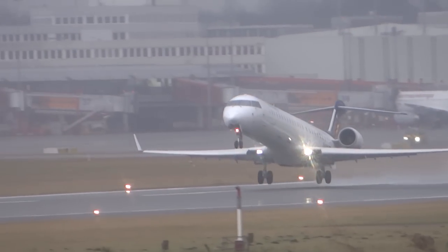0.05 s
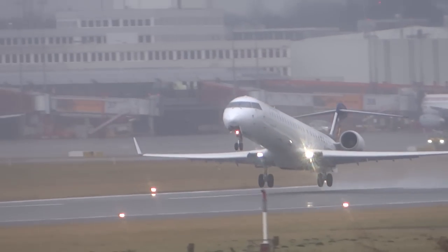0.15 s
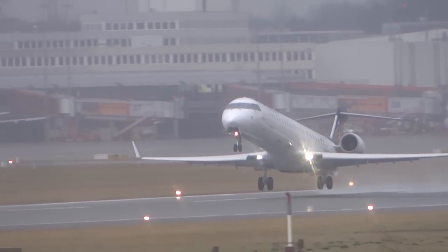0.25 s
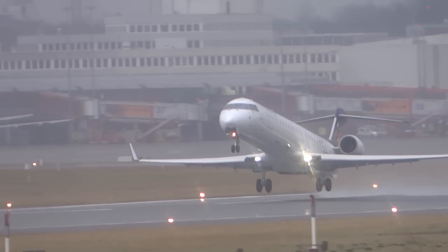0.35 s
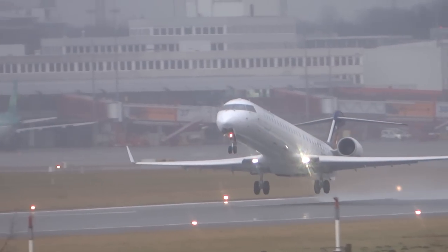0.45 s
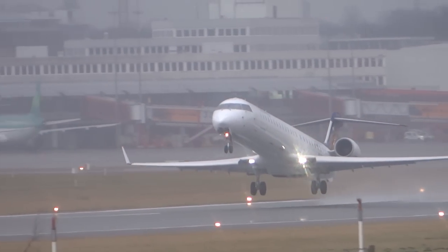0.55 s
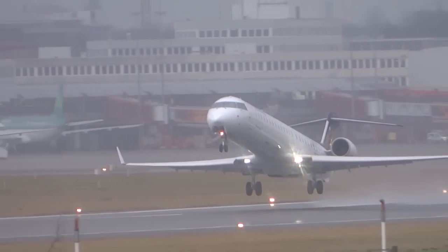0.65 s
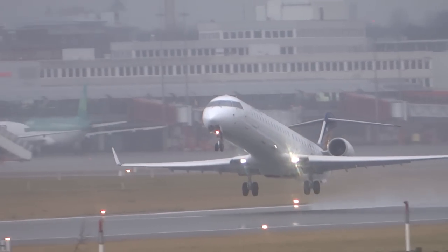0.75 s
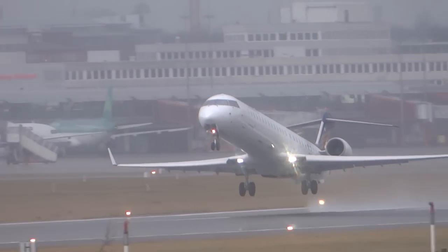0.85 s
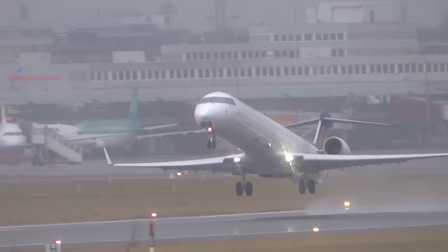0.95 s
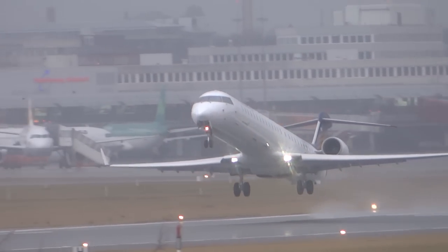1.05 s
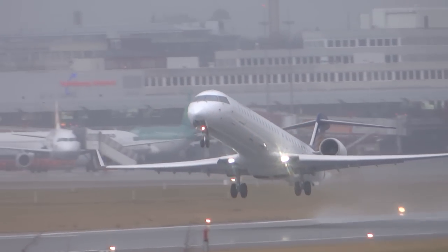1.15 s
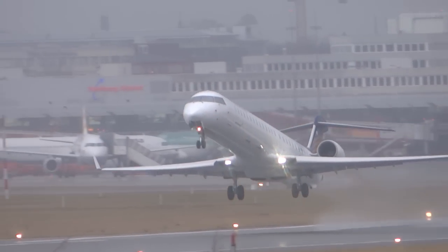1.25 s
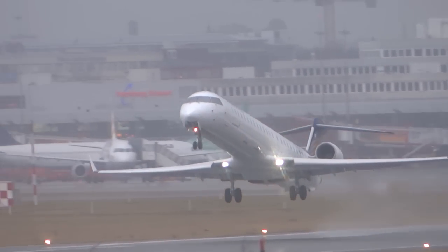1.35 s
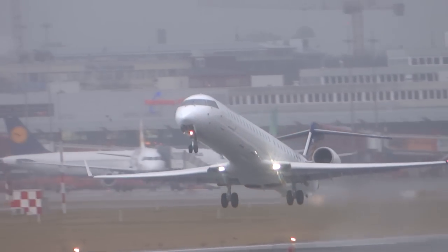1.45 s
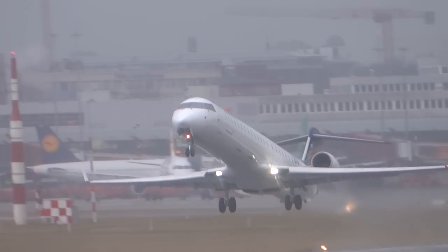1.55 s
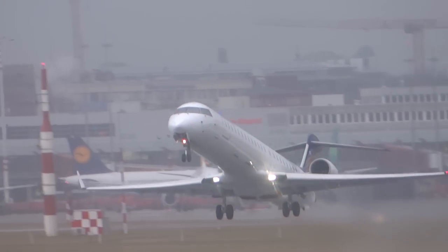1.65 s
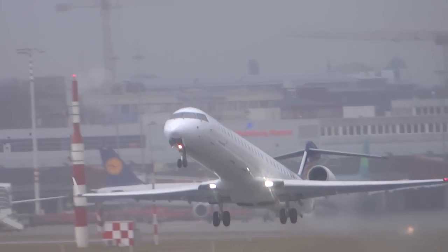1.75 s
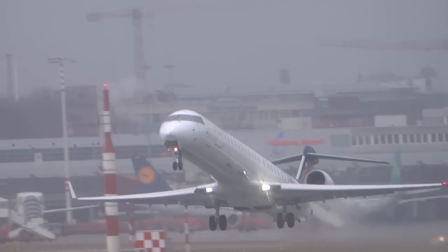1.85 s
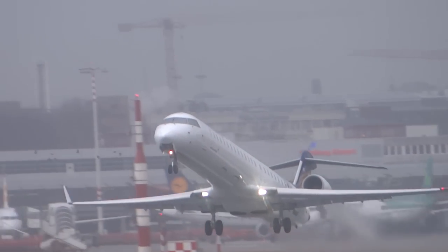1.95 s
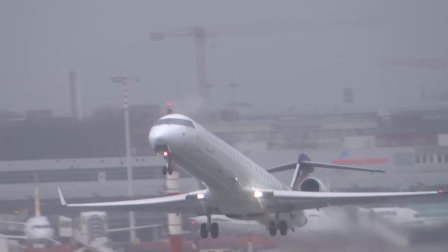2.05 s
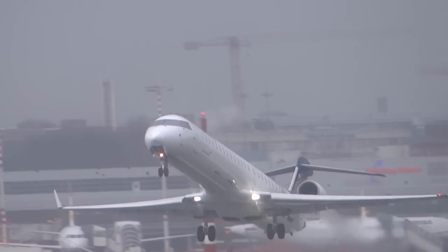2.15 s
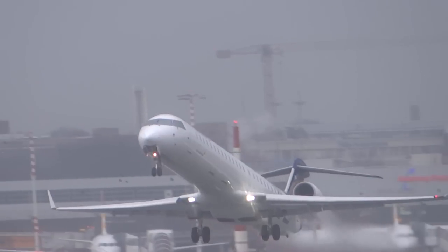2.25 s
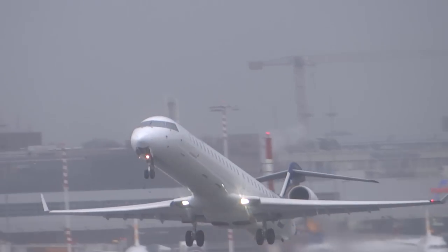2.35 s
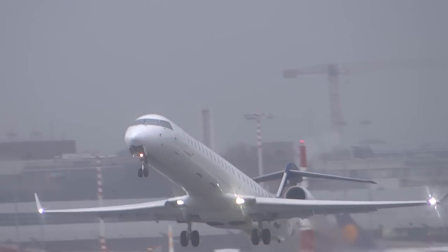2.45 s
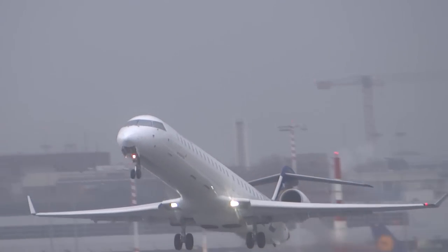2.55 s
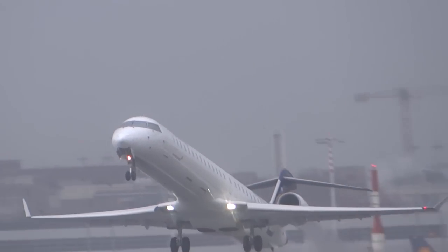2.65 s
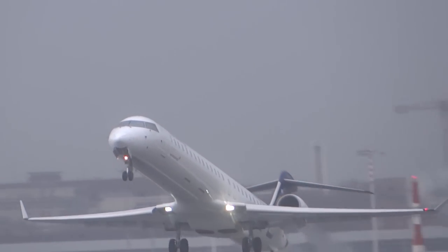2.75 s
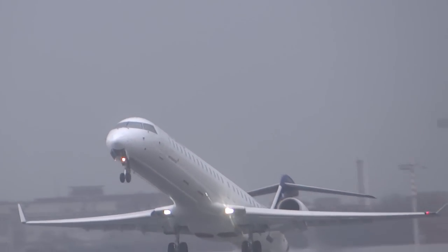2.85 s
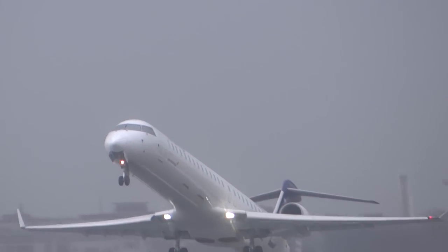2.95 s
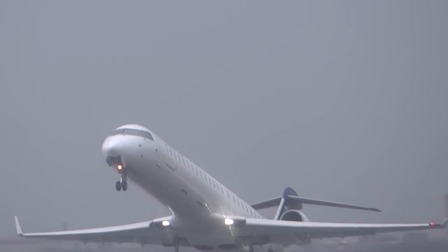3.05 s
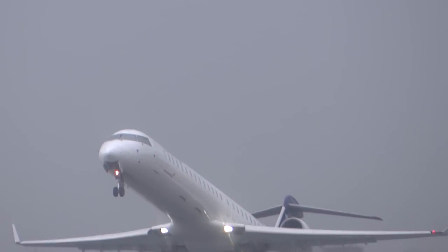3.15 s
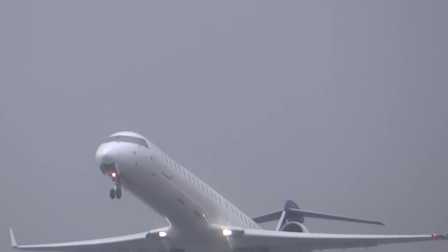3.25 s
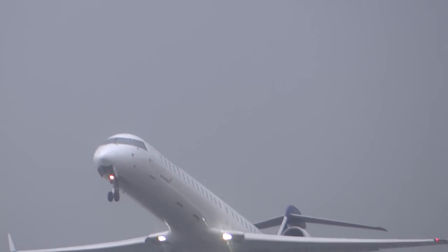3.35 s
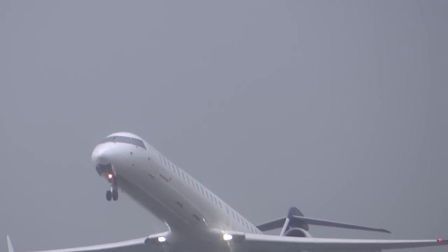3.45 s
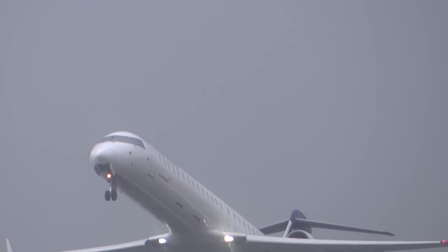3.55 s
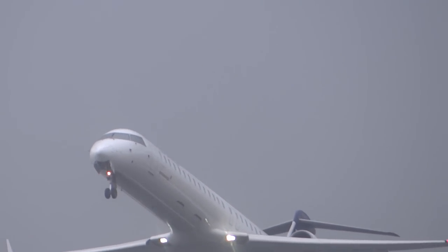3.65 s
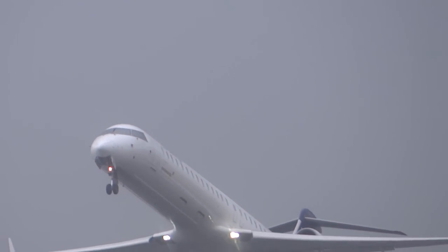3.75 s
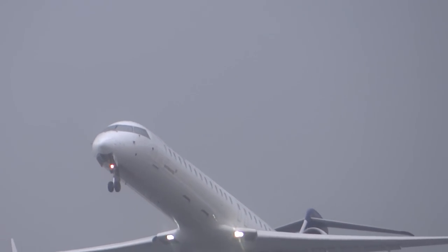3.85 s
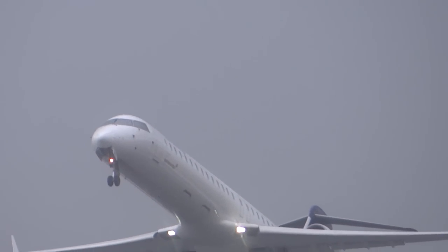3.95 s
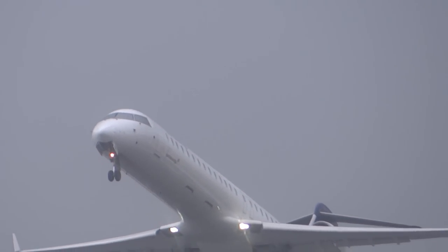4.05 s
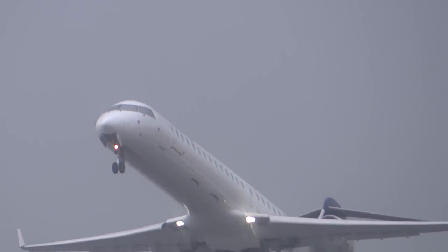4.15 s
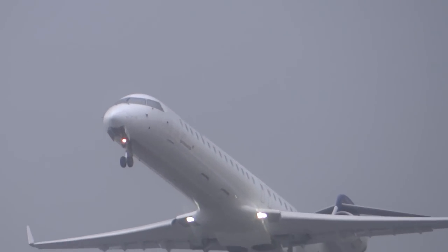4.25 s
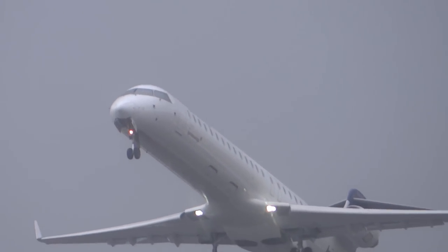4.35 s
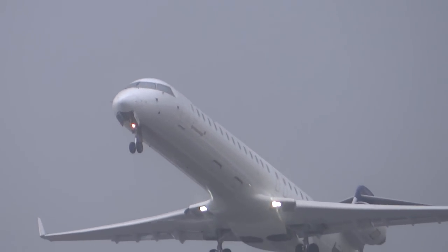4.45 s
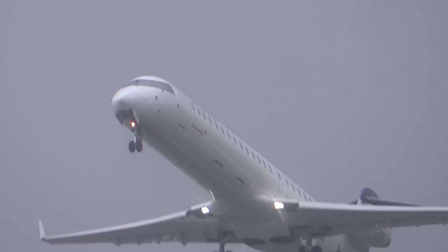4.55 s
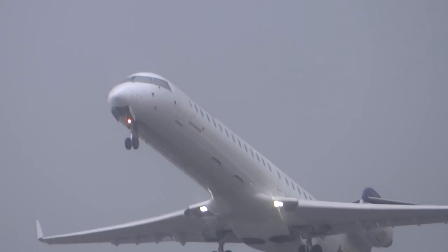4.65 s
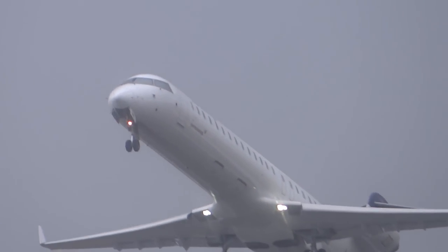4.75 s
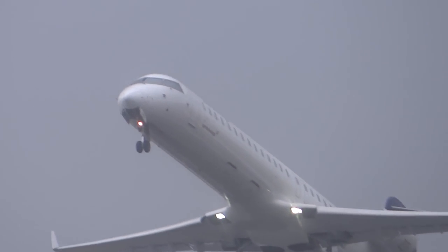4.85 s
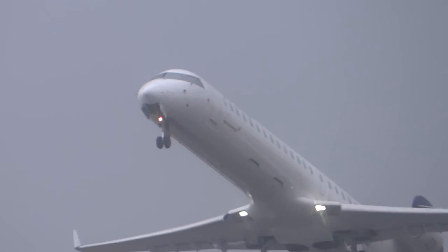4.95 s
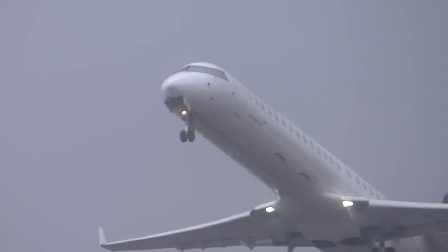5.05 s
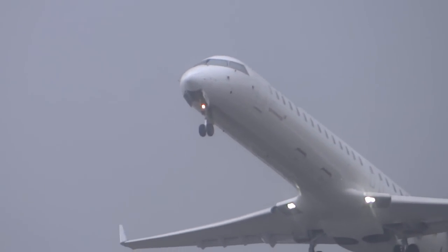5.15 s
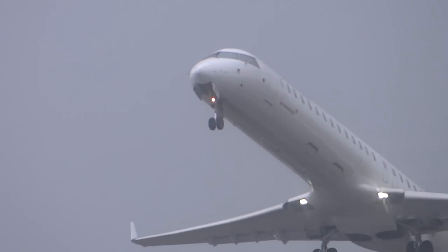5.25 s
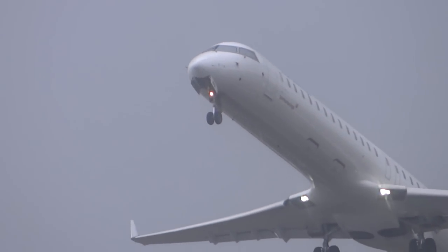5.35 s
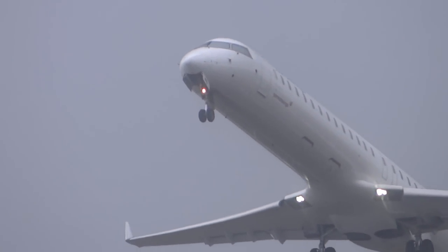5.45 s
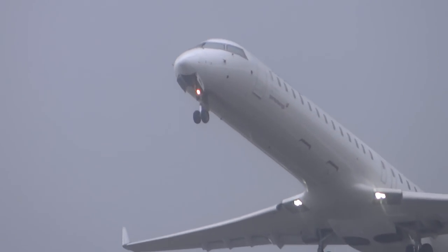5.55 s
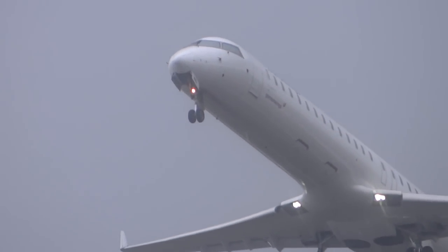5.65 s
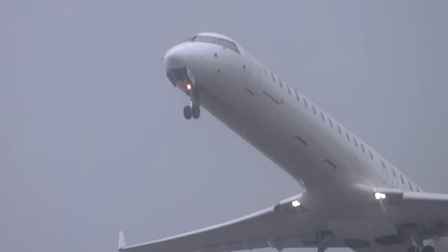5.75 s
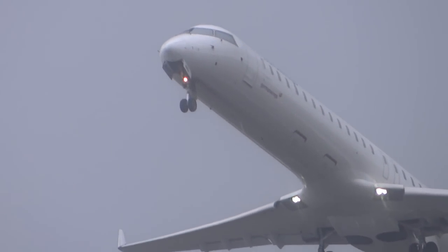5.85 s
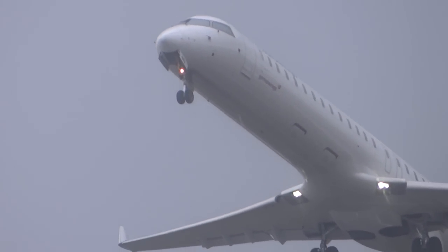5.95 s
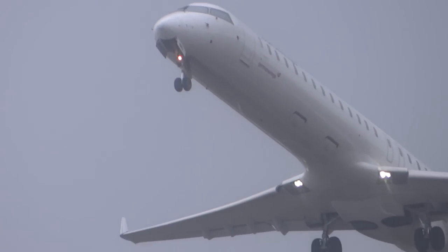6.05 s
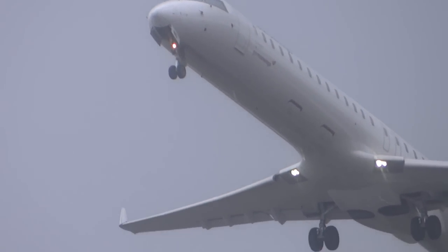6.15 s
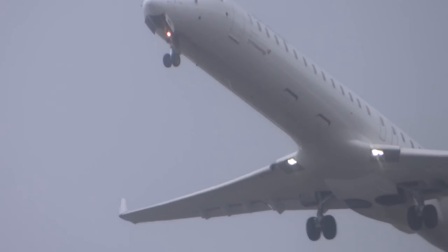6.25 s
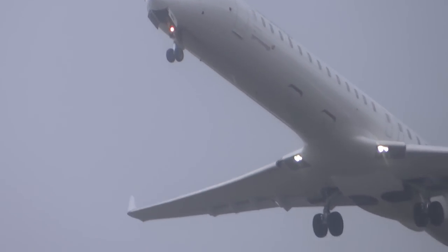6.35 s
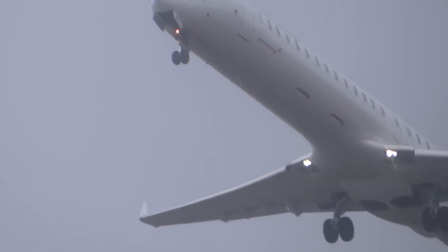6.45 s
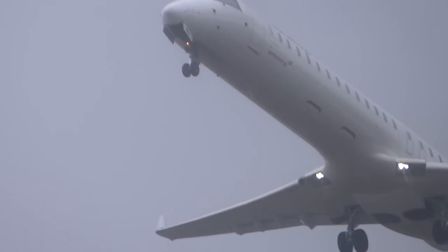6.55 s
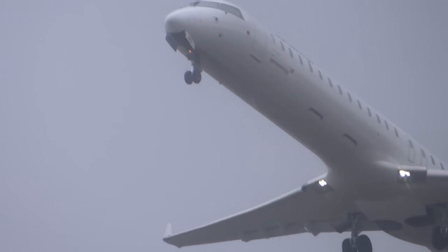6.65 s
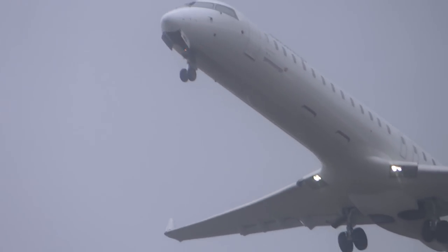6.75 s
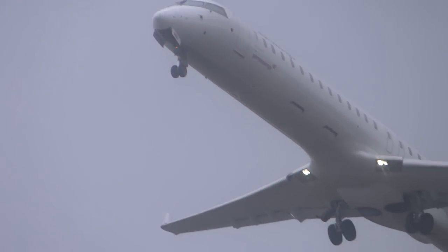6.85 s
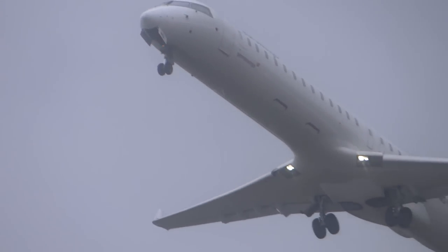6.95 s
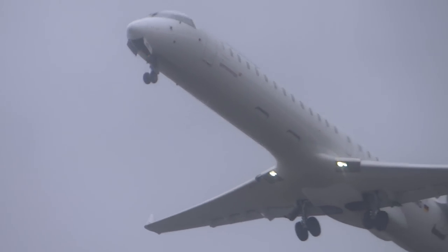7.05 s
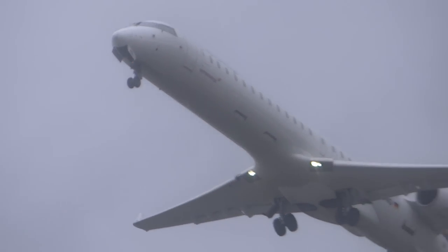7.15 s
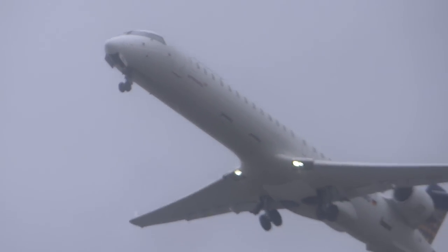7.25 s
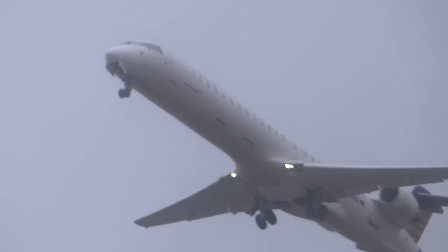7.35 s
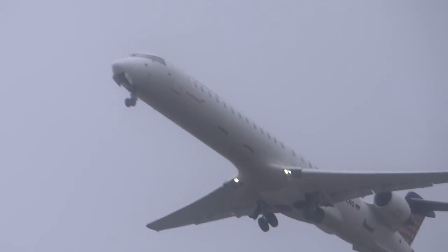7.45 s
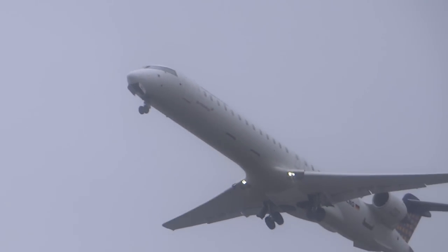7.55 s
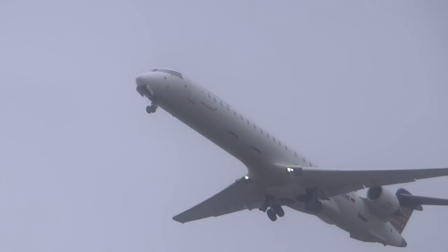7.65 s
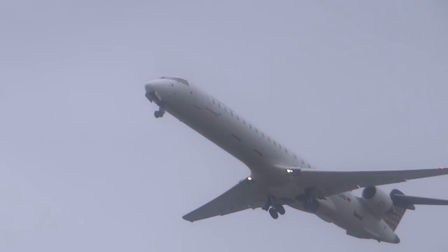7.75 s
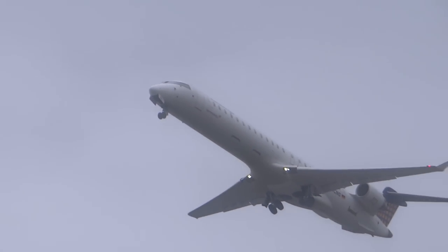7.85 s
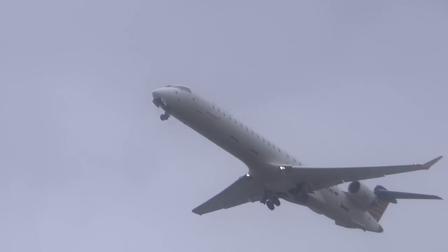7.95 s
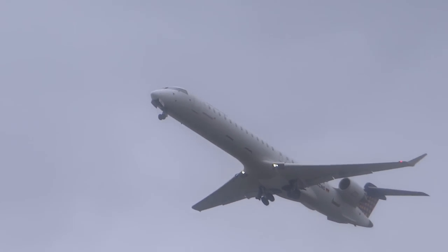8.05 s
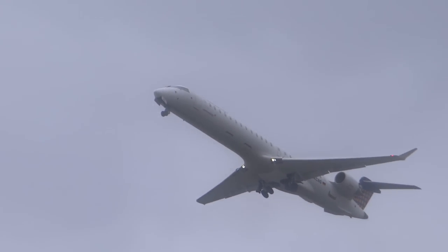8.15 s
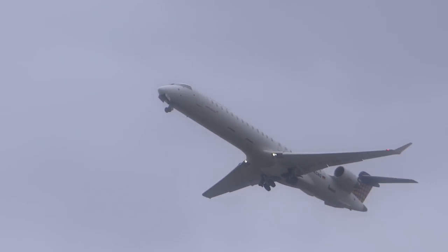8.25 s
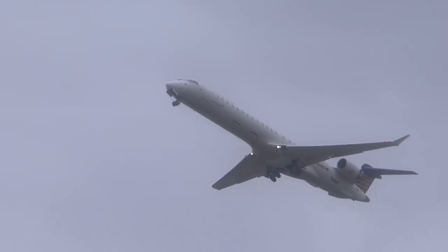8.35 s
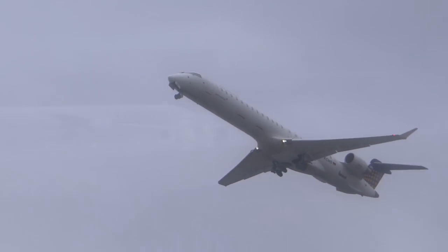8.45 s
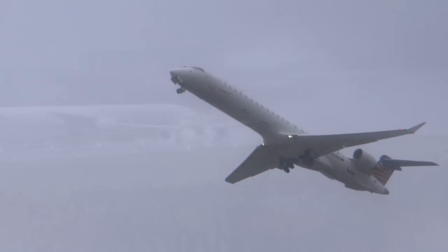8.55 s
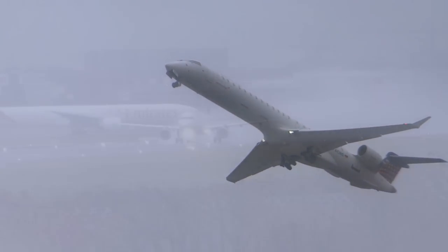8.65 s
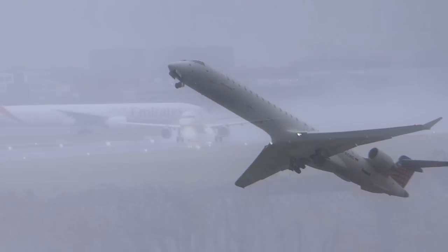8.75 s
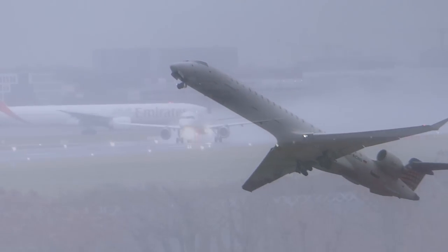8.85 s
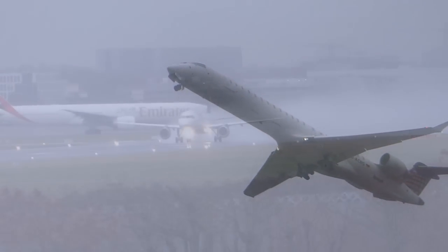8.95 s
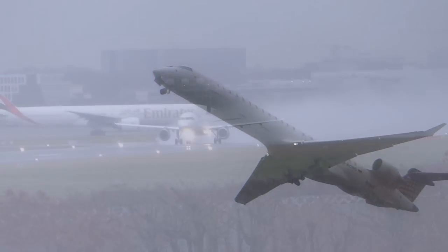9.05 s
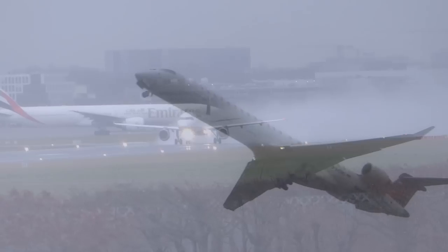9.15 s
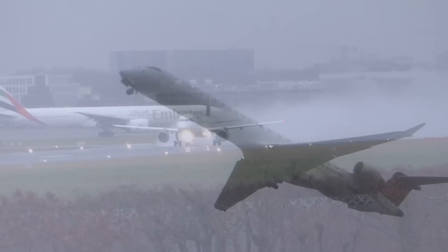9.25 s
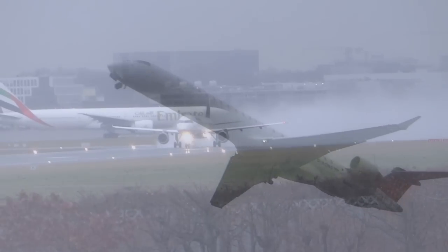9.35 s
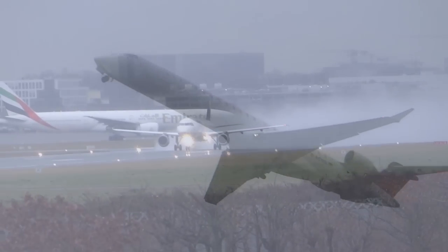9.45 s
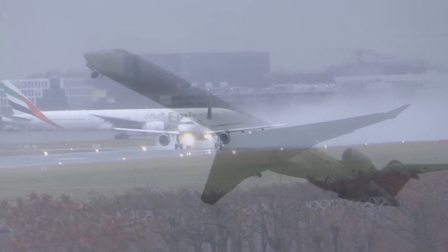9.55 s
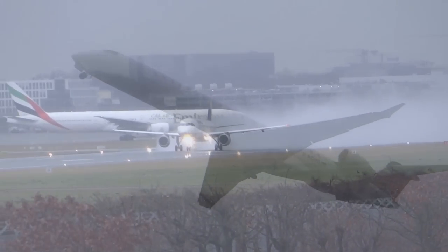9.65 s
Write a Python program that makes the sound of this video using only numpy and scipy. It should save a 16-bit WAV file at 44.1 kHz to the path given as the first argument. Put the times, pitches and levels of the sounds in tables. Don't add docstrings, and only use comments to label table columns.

```python
import sys
import numpy as np
from scipy import signal
from scipy.fft import rfft, irfft, next_fast_len
from scipy.io import wavfile
from scipy.ndimage import uniform_filter1d, map_coordinates

SR = 44100
rng = np.random.default_rng(int(sys.argv[2]) if len(sys.argv) > 2 else 0)


def gain_from_db(level_db):
    decades = np.asarray(level_db, float) / 20
    return 10 ** decades


def store_wav(level_fs):
    pcm = np.round(np.clip(np.atleast_2d(level_fs), -1, 1) * 32767)
    wavfile.write(sys.argv[1], SR, pcm.T.astype(np.int16))


N = 428211
STEP = 64

# [t/s, level/dB]
NEARNESS = [(0, -78), (2, -74.5), (3.5, -68.5), (4.6, -65.5), (5.2, -58.5), (5.8, -60), (6.3, -54.5),
            (6.75, -48), (7.0, -42), (7.25, -42.5), (7.6, -35.5), (8.0, -35), (8.5, -32.5), (9.0, -35.5),
            (9.4, -40.5), (9.71, -46)]
LOUD_DB, TURN_S = -35, 7.4
# [t/s, half length/s, level/dB]
GUSTS = [(5.9, 0.27, 4), (6.75, .15, 2), (7.05, .1, 2), (7.5, .06, 1.5), (7.74, 0.093, 2.5),
         (7.96, 0.042, -0.5), (8.22, 0.053, 1), (8.8, 0.12, 8.5), (9.29, 0.057, 2.5), (9.7, 0.037, 4)]
# [f/Hz, level/dB per Hz]
EXHAUST = [(30, -39), (150, -18), (280, -7), (420, -6.5), (560, -5), (720, -14), (880, -14), (1050, -8.5),
           (1500, -10), (2600, -11), (3300, -17), (3950, -16), (4500, -25), (5850, -26.5), (6200, -32),
           (7600, -39), (9500, -62), (16000, -120)]
RANGE_EDGES = (220, 800, 1650, 4250)
# [level when loud/dB, growth/dB per dB nearness, share of gusts, drift after the turn/dB per s]
RANGES = [
    (-46.5, .9, .3, -3),
    (-37, 1.09, .3, 2.5),
    (-32, 1.04, .85, -2.5),
    (-35, 1.08, 0.91, -0.44),
    (-57.5, 1.22, 0.93, 5),
]
# [t/s, half length/s, loss/dB]
RUMBLE_FADES = [
    (7.3, .05, 3),
    (7.75, .22, 4),
    (9.62, .07, 7),
]
# [t/s, half length/s, loss/dB]
GROUND_FADES = [(6.55, .2, 3), (6.9, .06, 2), (7.87, .03, 3), (8.29, .03, 5), (8.65, .2, 3), (9.12, .05, 2),
                (9.72, .06, 5)]
# [t/s, f/Hz]
FAN_HZ = [(0, 494), (5.5, 494), (7, 492), (7.5, 490), (8, 484.5), (8.5, 480), (8.8, 477.5), (9, 475),
          (9.5, 466.5), (9.71, 464)]
# [multiple of the hum, level/dB]
SIDE_TONES = [
    (4, -2.5),
    (8.6, -16.5),
    (12.05, -29.5),
]
# [t/s, half length/s, loss/dB]
HUM_FADES = [(6.767, .05, 10), (7.07, 0.021, 2), (7.25, 0.026, 6), (7.575, .03, 16), (7.923, 0.1, 10),
             (8.269, .05, 27), (8.51, 0.074, 18), (8.9, 0.04, 17), (9.009, 0.02, 17), (9.228, 0.043, 9),
             (9.333, 0.044, 6), (9.64, 0.057, 21)]
# [t/s, half length/s, loss/dB]
WHINE_FADES = [(6.9, 0.07, 18), (7.4, 0.047, 13), (7.65, .03, 6), (7.91, 0.075, 7.7), (8.14, 0.045, 5.9),
               (8.24, 0.013, 16), (8.46, 0.078, 12), (8.68, 0.067, 9), (8.91, 0.056, 10), (9.14, 0.042, 20),
               (9.6, 0.094, 4.7)]

# [share of length, pitch ratio, level/dB]
LOW_NOTE = [(0, 1.05, -11), (.1, 1.045, 0), (.5, 1.0, -2), (.92, .997, -4.5), (1, .99, -22)]
# [share of length, pitch ratio, level/dB]
HIGH_NOTE = [(0, .97, -16), (.3, 1.012, -9), (.8, 1.0, 1.5), (1, .98, -20)]
# [t/s, length/s, f/Hz, level/dB]
LOW_AT = [
    (-.02, .12, 5090, -60),
    (2.665, 0.14, 5030, -55),
    (5.055, 0.15, 5040, -53),
    (7.736, 0.12, 5110, -62),
]
# [t/s, length/s, f/Hz, level/dB]
HIGH_AT = [
    (2.46, 0.08, 7220, -55.5),
    (4.85, 0.084, 7360, -58),
    (7.52, 0.14, 7440, -59),
]
SEE_HZ, SAW_HZ, SEE_S, SAW_S, DROOP = 3470, 4470, 0.061, .052, .013
# [t/s, level/dB]
SEE = [(.76, -84), (1.197, -79), (1.5, -77), (1.77, -81), (2.045, -79.5), (2.325, -77), (2.597, -79.5)]
# [t/s, level/dB]
SAW = [(1.06, -91.5), (1.3, -83), (1.632, -84), (1.88, -84), (2.145, -80), (2.445, -85)]
DIP_TOP_HZ, DIP_LOW_HZ = 5850, 4780
# [t/s, length/s, level/dB]
DIPS = [
    (4.236, .037, -75),
    (4.318, .042, -78),
    (4.393, .058, -78),
]
# [start t/s, end t/s, start f/Hz, end f/Hz, level/dB]
WHISTLES = [
    (.83, .9, 4750, 4740, -89),
    (1.805, 1.858, 4750, 4820, -86),
    (3.54, 3.565, 5500, 4770, -85.5),
    (3.69, 3.725, 5300, 4900, -81),
    (3.825, 3.86, 6000, 4800, -82),
    (3.905, 3.945, 4700, 5400, -81),
    (4.115, 4.165, 5900, 6400, -78),
    (4.797, 4.84, 4800, 5100, -74),
    (5.285, 5.3, 6300, 5440, -75),
    (5.3, 5.36, 5560, 4800, -70),
]
# [start t/s, end t/s, centre f/Hz, width/Hz, level/dB]
BUZZES = [
    (.085, .16, 8000, 700, -77),
    (1.87, 1.9, 7700, 200, -80),
    (2.955, 3.0, 5200, 1800, -66),
    (3.04, 3.085, 5200, 1800, -69),
    (3.13, 3.17, 5400, 2200, -71),
    (3.455, 3.5, 8300, 400, -79),
    (3.77, 3.85, 7800, 500, -76),
    (5.36, 5.4, 5200, 1600, -69),
    (5.45, 5.49, 5400, 1800, -70),
]

# [start t/s, end t/s, level/dB]
ZOOM = [
    (6.02, 8.4, -70),
    (8.47, 8.74, -73),
    (8.74, 9.8, -89),
]
# [f/Hz, level/dB per Hz]
GEARS = [(5000, -40), (6500, -12), (7500, -7), (8000, -1), (8550, 0), (8800, -12), (9200, -11),
         (10000, -10), (10400, -17), (11300, -17), (11800, -9), (13000, -12), (13500, -18), (15600, -23)]
# [t/s, peak level/dB, brightness/dB]
CLICKS = [(1.135, -72, 2), (1.346, -72, 2), (2.266, -52, -8), (6.022, -60, 3), (6.125, -30, 0),
          (7.027, -64, 3), (8.13, -50, 3), (8.283, -54, 3), (8.365, -43, 3), (8.504, -54, 3),
          (9.02, -62, 3)]
# [f/Hz, level/dB, t60/s]
PLASTIC = [(1800, 3, .009), (2800, 4, .009), (3600, 1, .008), (4500, 5, .007), (7700, 2, .005),
           (9400, 0, .0045), (12800, -12, .004)]
# [f/Hz, level/dB]
INNER_TONES = [
    (59, -82),
    (555, -84),
    (9749, -95),
    (12480, -102),
]

# [f/Hz, level/dB per Hz]
DRONE = [(65, -40), (110, -3.5), (187, -11.5), (339, -1), (422, -1), (576, 1), (851, 0.5), (1260, 2),
         (2970, -15.5), (3640, -15), (4600, -30), (5980, -53), (10100, -120)]
# [t/s, half length/s, loss/dB]
GROWL_FADES = [
    (7.0, .18, 10),
    (7.8, .3, 9),
    (9.4, .25, 8),
]
# [f/Hz, level/dB per Hz]
HISS = [(2820, -30), (4800, 0), (5090, -10), (6520, -2), (8180, -7), (9570, -8), (15600, -14)]
# [f/Hz, left-right level/dB]
LEAN = [(100, 0), (300, -.7), (600, -1.3), (1200, -1.7), (2500, -2), (5000, -1.3), (12000, -.5)]
# [f/Hz, left-right likeness]
ALIKE = [(30, .997), (100, .9993), (180, .998), (500, .98), (3000, .98), (9000, .95), (12000, .995)]


def jet():
    direct_and_diffuse = roar() + fan() * [[1], [.4]]
    both = ports(direct_and_diffuse)
    return filtered(both, lambda hz: gain_from_db(along(LEAN, hz) * [[.5], [-.5]]))


def roar():
    def response(hz):
        lowpasses = [1 / (1 + (hz / edge) ** 8) for edge in RANGE_EDGES]
        shares = np.diff([0 * hz] + lowpasses + [1 + 0 * hz], axis=0)
        return (gain_from_db(along(EXHAUST, hz)) * shares)[:, None]

    bands = filtered(patchy(1.64), response)
    fades = [RUMBLE_FADES, GROUND_FADES, (), (), ()]
    return sum(layer(*law, lost) * band / np.std(band[0]) for law, lost, band in zip(RANGES, fades, bands))


def fan():
    hz = np.interp(np.arange(N) / SR, *np.transpose(FAN_HZ))
    far_hum = gain_from_db(-79.5)
    hum_gain = layer(-35.5, grows=1.4, gusty=.5, after_turn=2.4, fades=HUM_FADES) + far_hum
    hum = hum_gain * tone(hz, flicker=0.36, rate=18)
    blade_hz = hz * 8.025
    twin = tone(blade_hz, flicker=0.55, rate=46) + 1.36 * tone(blade_hz, flicker=1.94, rate=190)
    sides = sum(gain_from_db(level) * tone(hz * k, flicker=0.36, rate=20) for k, level in SIDE_TONES)
    whine_gain = layer(-43, grows=1.5, gusty=.8, after_turn=2, fades=WHINE_FADES)
    return hum + whine_gain * gain_from_db(-4.5) * (twin + sides)


def birds():
    song = clear_notes() + far_whistles() + hoarse_trills()
    t = np.arange(SR // 2) / SR
    t60 = .5
    tail = rng.standard_normal((2, len(t))) * gain_from_db(-60 * t / t60)
    tail /= np.linalg.norm(tail[0])
    echo = signal.fftconvolve(song[None], tail, axes=1)[:, :N] * gain_from_db(-12)
    return ports(np.array([song + echo[0], song + 3 * echo[1]])) * gain_from_db([[-.8], [.8]])


def clear_notes():
    song = np.zeros(N)
    for shape, notes in ((LOW_NOTE, LOW_AT), (HIGH_NOTE, HIGH_AT)):
        share, ratio, rel_db = np.transpose(shape)
        for s, length, pitch, level in notes:
            first = max(round((s - .01) * SR), 0)
            u = ((first + np.arange(SR // 5)) / SR - s) / length
            phase = 2 * np.pi * np.cumsum(pitch * np.interp(u, share, ratio)) / SR
            strength = gate(u, 0, 1, .1) * gain_from_db(level + 4 + np.interp(u, share, rel_db))
            song[first:][:len(u)] += strength * np.sin(phase)
    return song


def far_whistles():
    song = np.zeros(N)
    for t0, t1, hz0, hz1, db in whistle_list():
        t = np.linspace(0, 1, round((t1 - t0) * SR))
        phase = 2 * np.pi * np.cumsum(hz0 + (hz1 - hz0) * t) / SR
        arch = np.abs(np.sin(np.pi * t)) ** .5
        song[round(t0 * SR):][:len(t)] += gain_from_db(db + 6.5) * arch * np.sin(phase)
    return song


def whistle_list():
    rows = [(s, s + SEE_S, SEE_HZ, SEE_HZ * (1 - DROOP), db) for s, db in SEE]
    rows += [(s, s + SAW_S, SAW_HZ, SAW_HZ * (1 - DROOP), db) for s, db in SAW]
    for s, length, db in DIPS:
        middle = s + length / 2
        rows.append((s, middle, DIP_TOP_HZ, DIP_LOW_HZ, db))
        rows.append((middle, s + length, DIP_LOW_HZ, DIP_TOP_HZ, db))
    return rows + list(WHISTLES)


def hoarse_trills():
    song = np.zeros(N)
    for t0, t1, hz, width, db in BUZZES:
        t = np.arange(round((t1 - t0) * SR)) / SR
        band = signal.butter(3, [hz - width / 2, hz + width / 2], "bandpass", fs=SR, output="sos")
        rough = unit(signal.sosfilt(band, rng.standard_normal(6000))[-len(t):])
        trill = 1 + 0.35 * np.sin(2 * np.pi * 170 * t)
        arch = np.abs(np.sin(np.pi * t / t[-1])) ** 0.4
        song[round(t0 * SR):][:len(t)] += gain_from_db(db) * arch * trill * rough
    return song


def camera():
    inner = sum(gain_from_db(db) * tone(hz, flicker=1.5, rate=25) for hz, db in INNER_TONES)
    return zoom_motor() + inner + rocker_clicks()


def zoom_motor():
    gears = unit(ports(patchy(1.5), GEARS))
    t = np.arange(N) / SR
    since = np.abs(t - ZOOM[0][0])
    runs = sum(gain_from_db(db) * gate(t, t0, t1, .04) for t0, t1, db in ZOOM)
    spin_up_db, spin_up_s = 8, 0.28
    return runs * gain_from_db(5.5 - spin_up_db * np.exp(-since / spin_up_s)) * gears


def rocker_clicks():
    t, clicks = np.arange(1200) / SR, np.zeros(N)
    for s, db, bright_db in CLICKS:
        luck = rng.standard_normal((len(PLASTIC), 2))
        decay = gain_from_db(bright_db - 60 * t / .008)
        snap = 1.1 * rng.standard_normal(len(t)) * decay * (1 - np.exp(-t / .0005))
        for (hz, level, t60), (luck_db, phase) in zip(PLASTIC, luck):
            swell = (1 - np.exp(-t * hz / 4)) ** 2
            ring = gain_from_db(level + luck_db + bright_db * (hz > 6000) - 60 * t / t60)
            snap += swell * ring * np.sin(2 * np.pi * hz * t + phase)
        clicks[round(s * SR):][:len(t)] += gain_from_db(db + 9.5) * snap
    return signal.lfilter(*signal.butter(2, 11000, fs=SR), clicks)


def airfield():
    drone = ports(patchy(0.48), DRONE)
    growl = filtered(rng.standard_normal(N), lambda hz: (hz / 60) ** 4 / (1 + (hz / 60) ** 4.82))
    growl_gain = layer(-57.5, grows=.5, gusty=.3, after_turn=.3, fades=GROWL_FADES)
    return gain_from_db(-59.5) * unit(drone) + growl_gain * unit(growl)


def amplifier_hiss():
    hiss = filtered(rng.standard_normal(N), lambda hz: gain_from_db(along(HISS, hz)))
    return gain_from_db(-80) * unit(hiss)


def layer(db, grows, gusty, after_turn, fades=()):
    t = np.arange(0, N, STEP) / SR
    near_db = np.interp(t, *np.transpose(NEARNESS)) - LOUD_DB
    turn_db = after_turn * np.clip(t - TURN_S, 0, None)
    return fine(gain_from_db(db + grows * near_db + gusty * bumps(GUSTS) + turn_db - bumps(fades)))


def bumps(rows):
    t = np.arange(0, N, STEP) / SR
    return sum(db * np.exp(-((t - s) / half) ** 2) for s, half, db in rows)


def fine(control):
    return np.interp(np.arange(N), np.arange(len(control)) * STEP, control)


def wobble(rate):
    knots = rng.standard_normal(int(N * 200 / SR) + 4)
    place = np.arange(0, N, STEP) * min(rate, 199) / SR
    return fine(map_coordinates(knots, [place], order=2))


def tone(hz, flicker, rate):
    phase = 2 * np.pi * np.cumsum(hz * np.ones(N)) / SR
    return unit((1 + flicker * wobble(rate)) * np.cos(phase) - flicker * wobble(rate) * np.sin(phase))


def patchy(depth_db):
    z = signal.stft(rng.standard_normal((2, N)), nperseg=512)[2]
    field = uniform_filter1d(rng.standard_normal(z.shape[1:]), size=5, axis=0)
    field = uniform_filter1d(field, size=30, axis=1)
    return signal.istft(z * gain_from_db(depth_db * unit(field)), nperseg=512)[1][:, :N]


def ports(pair, colour=()):
    def response(hz):
        turn = np.arccos(np.clip(along(ALIKE, hz), 0, 1)) / 2
        gain = gain_from_db(along(colour, hz)) if len(colour) else 1
        return gain * np.array([np.cos(turn), np.sin(turn)])

    mid, side = filtered(pair, response)
    return np.array([mid + side, mid - side])


def filtered(x, response):
    m = next_fast_len(N + 8192)
    return irfft(rfft(x, m) * response(np.fft.rfftfreq(m, 1 / SR)), m)[..., :N]


def along(points, hz):
    f, v = np.transpose(points)
    return np.interp(np.log(hz + 1), np.log(f + 1), v)


def gate(t, t0, t1, edge):
    return np.clip(np.minimum(t - t0, t1 - t) / edge + .5, 0, 1) ** 2


def unit(x):
    return x / np.sqrt(np.mean(x ** 2) + 1e-20)


def scene():
    return jet() + birds() + camera() + airfield() + amplifier_hiss()


def roll_off(x):
    return signal.sosfilt(signal.butter(12, 16470, fs=SR, output="sos"), x)


def record(dry):
    mix = filtered(dry, lambda hz: 1 / (1 + (hz / 15750) ** 400))
    return roll_off(mix)


dry = scene()
out = record(dry)
store_wav(out)
```